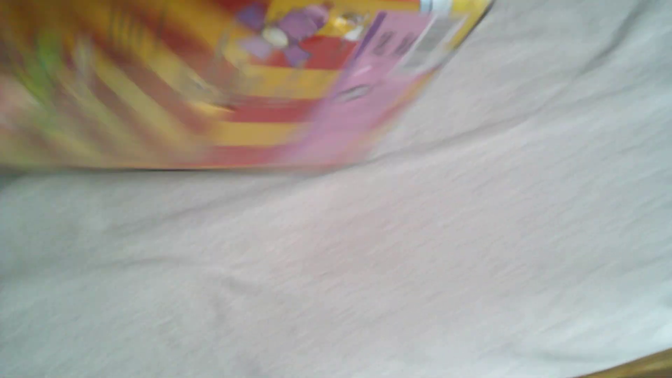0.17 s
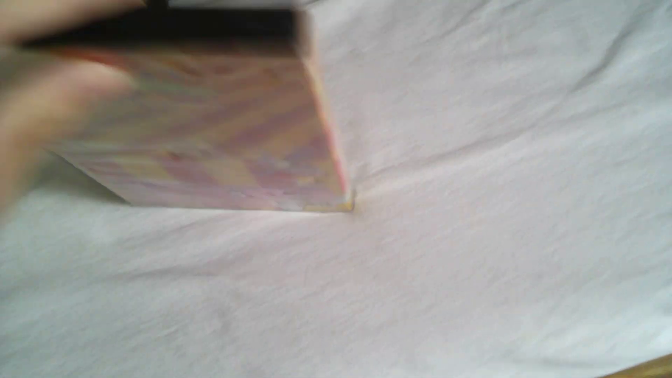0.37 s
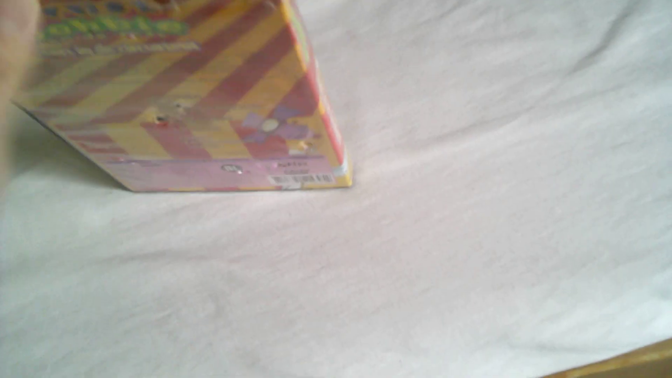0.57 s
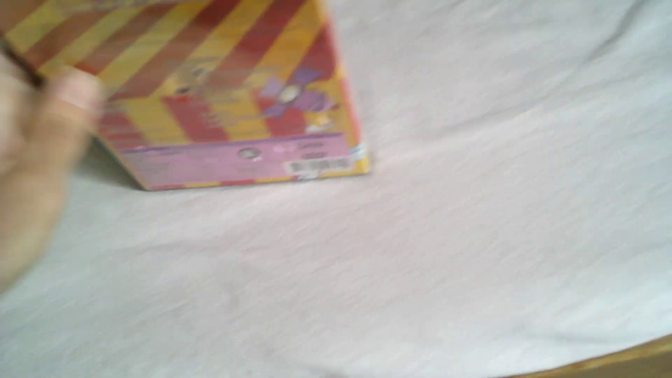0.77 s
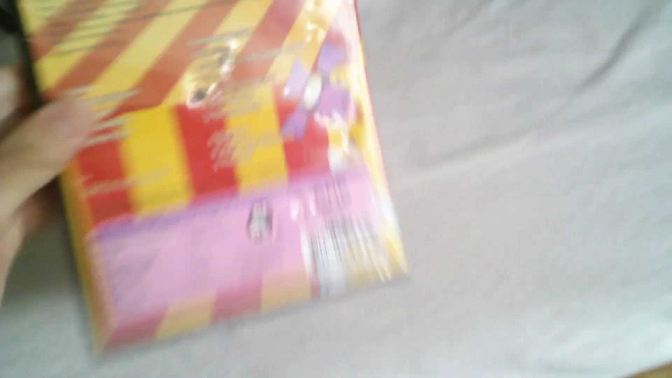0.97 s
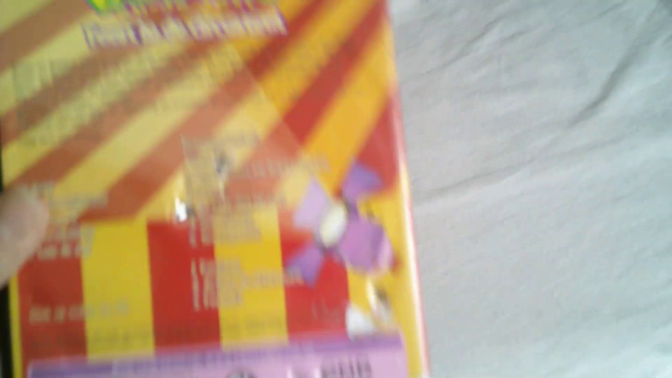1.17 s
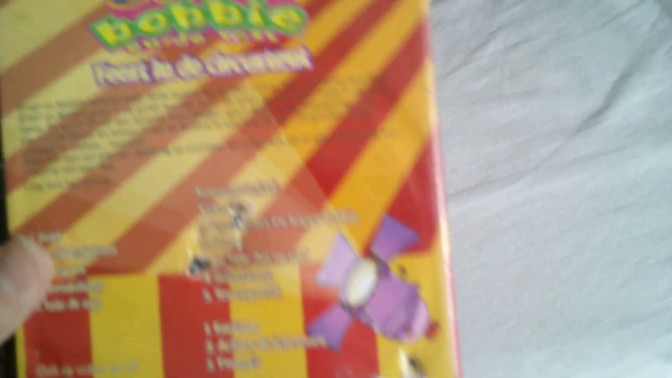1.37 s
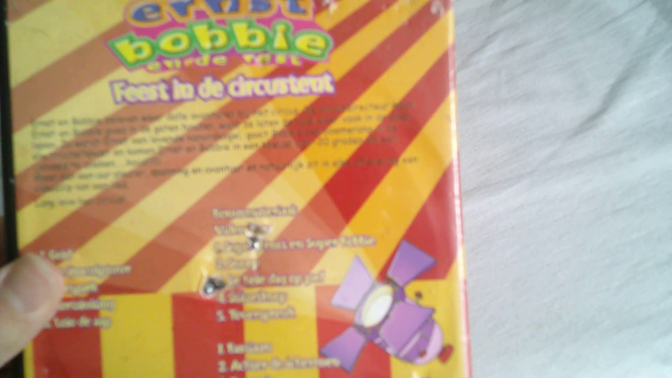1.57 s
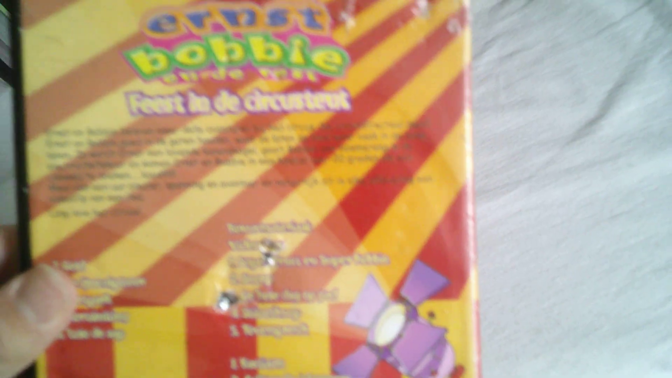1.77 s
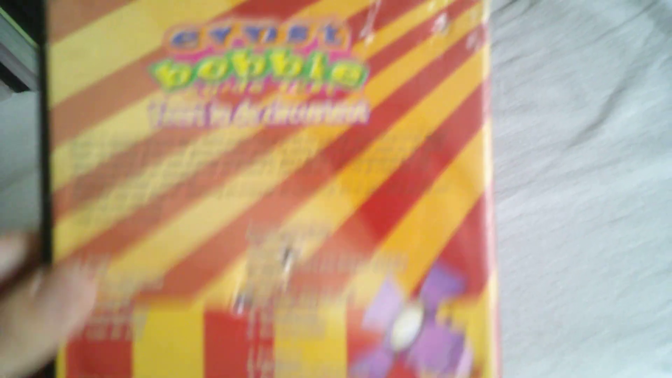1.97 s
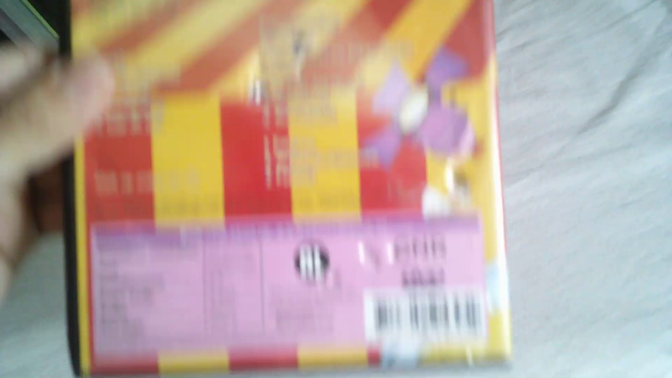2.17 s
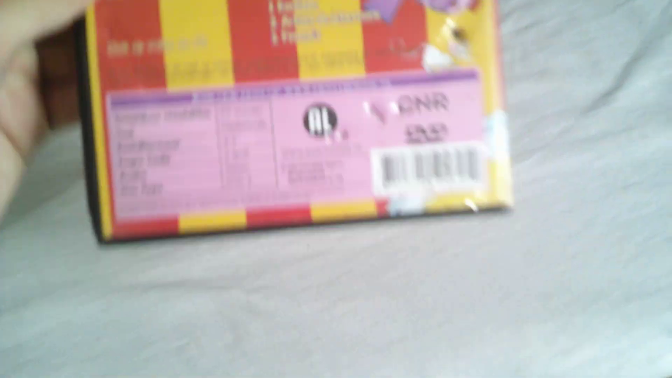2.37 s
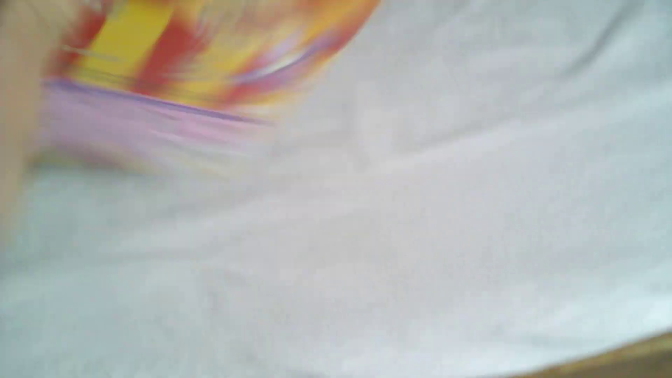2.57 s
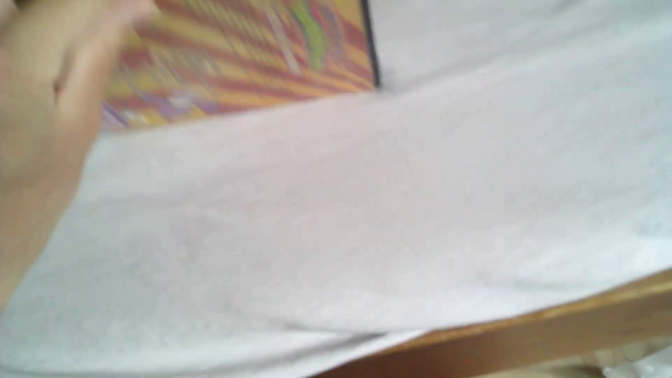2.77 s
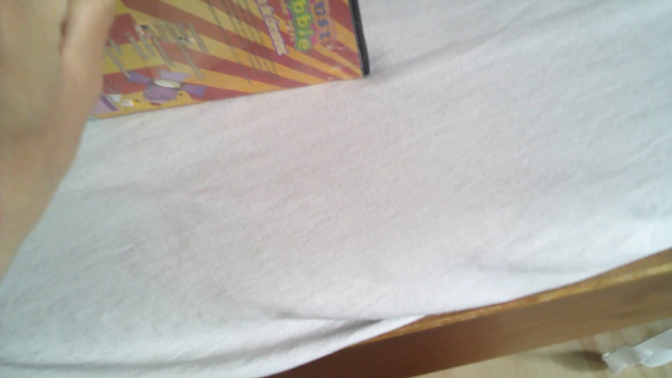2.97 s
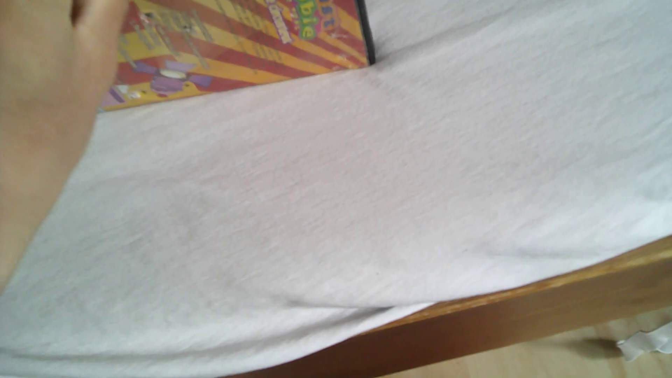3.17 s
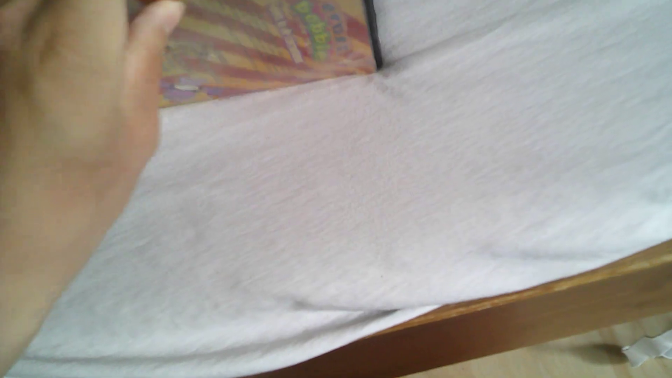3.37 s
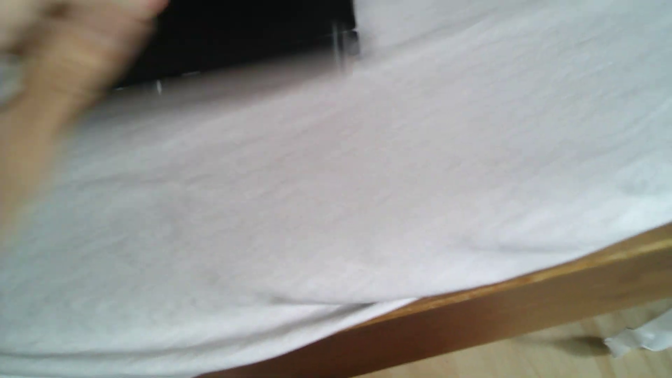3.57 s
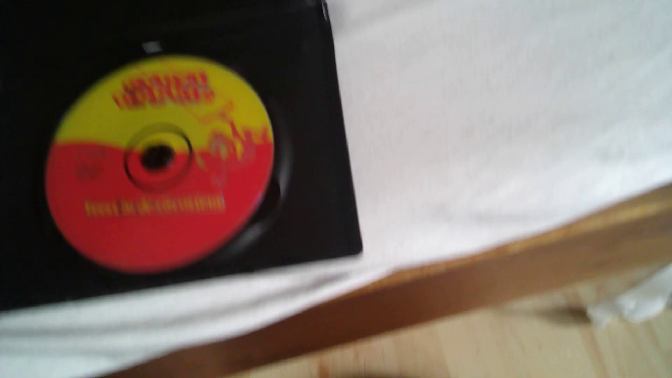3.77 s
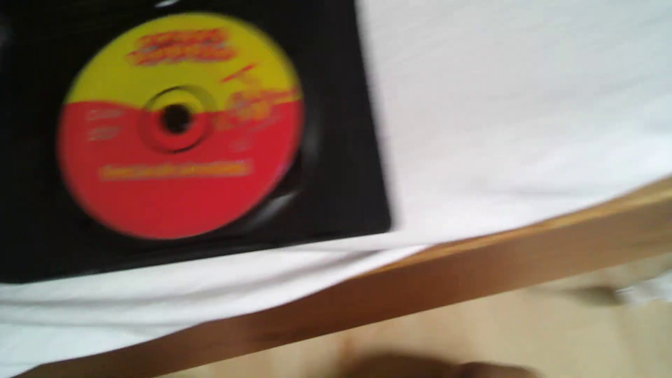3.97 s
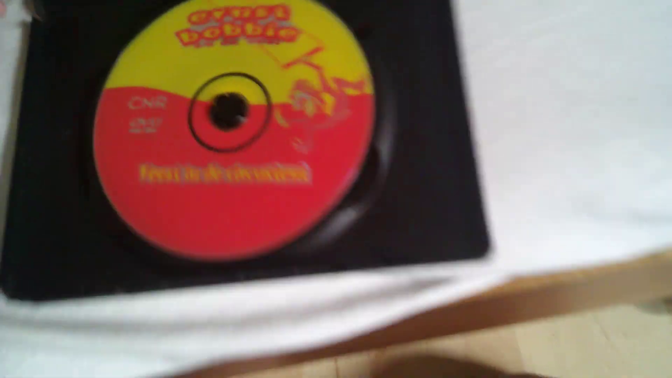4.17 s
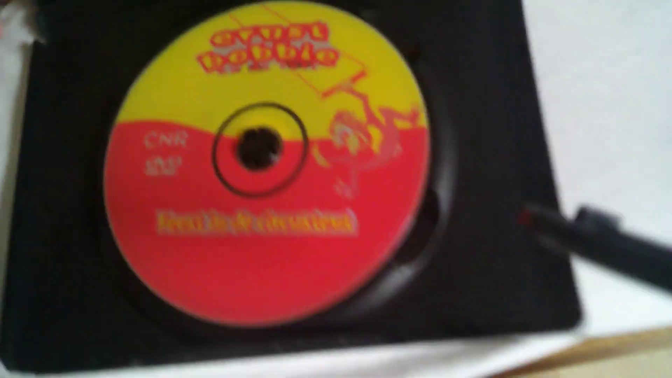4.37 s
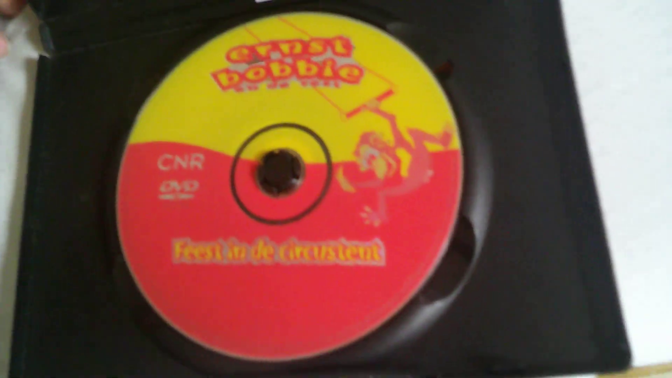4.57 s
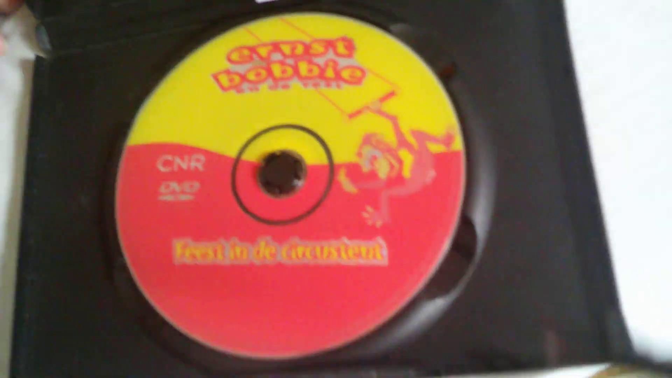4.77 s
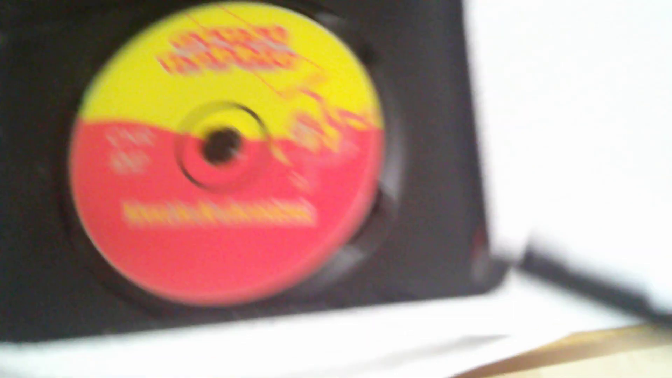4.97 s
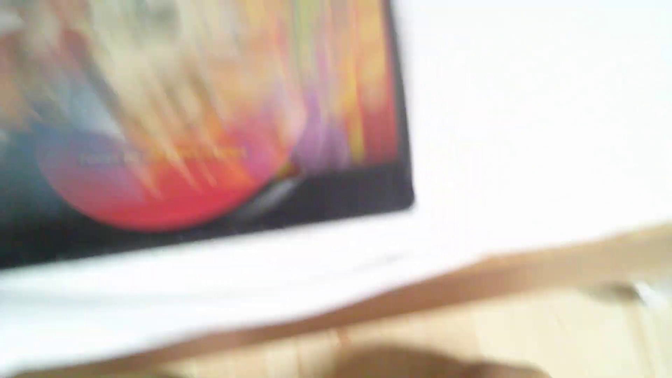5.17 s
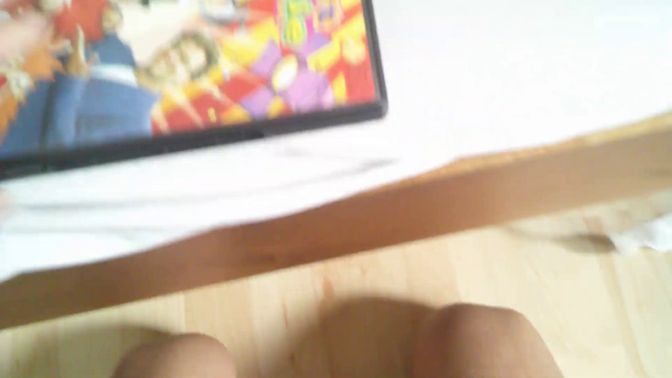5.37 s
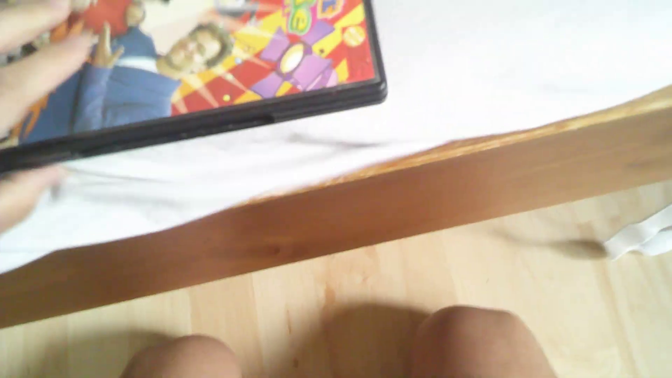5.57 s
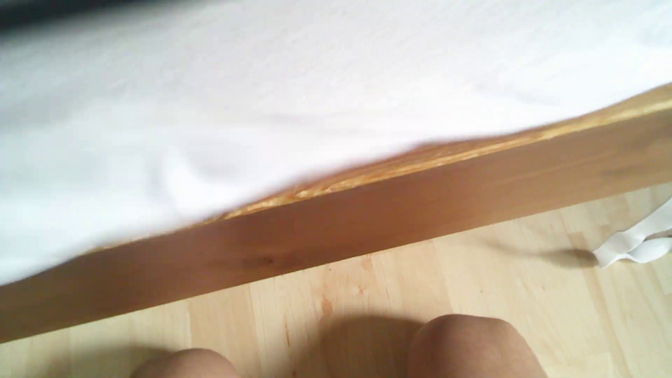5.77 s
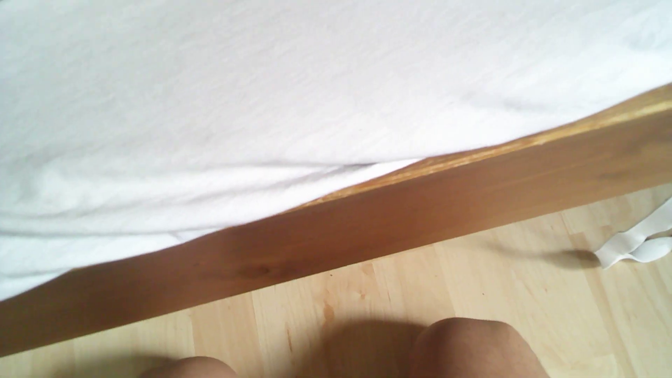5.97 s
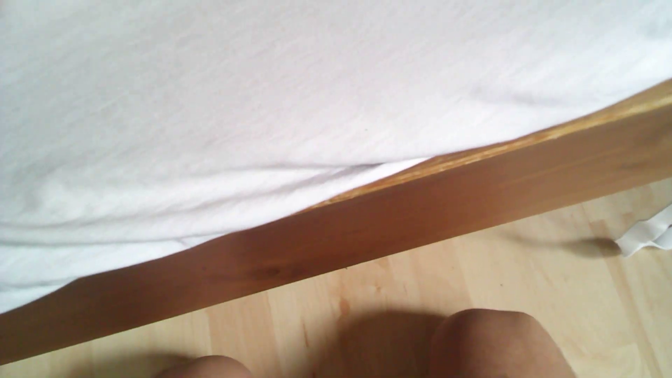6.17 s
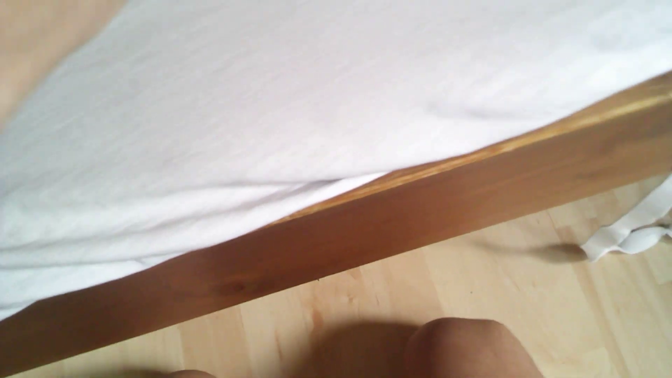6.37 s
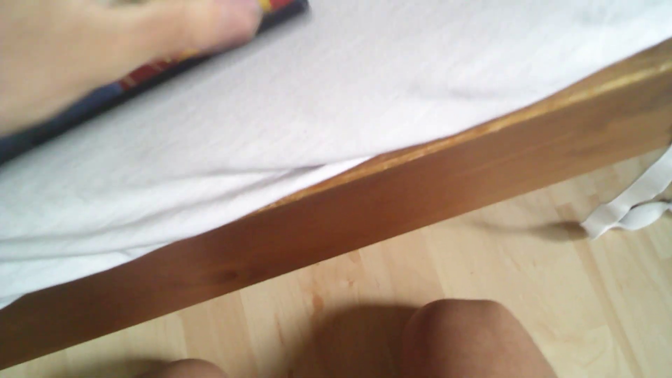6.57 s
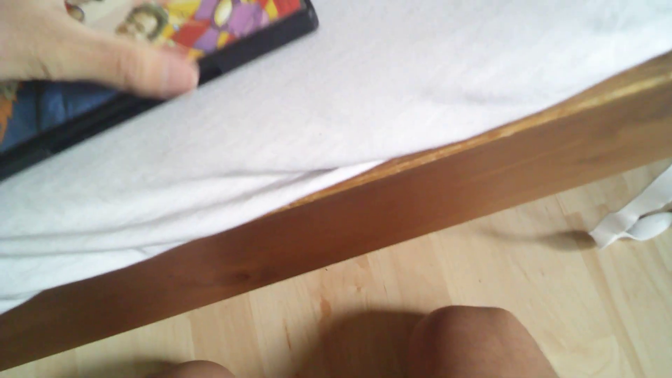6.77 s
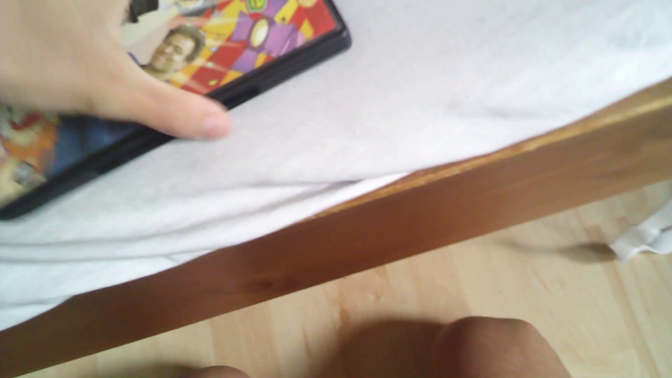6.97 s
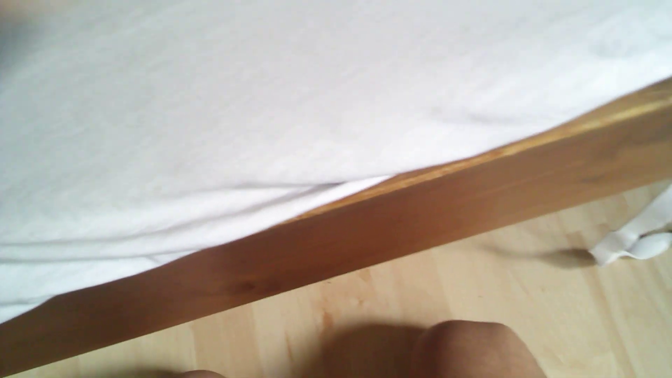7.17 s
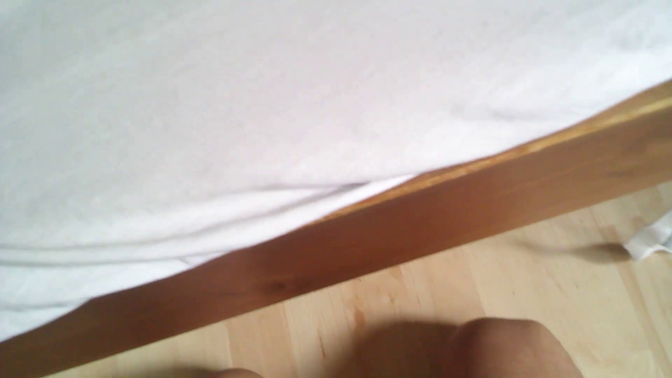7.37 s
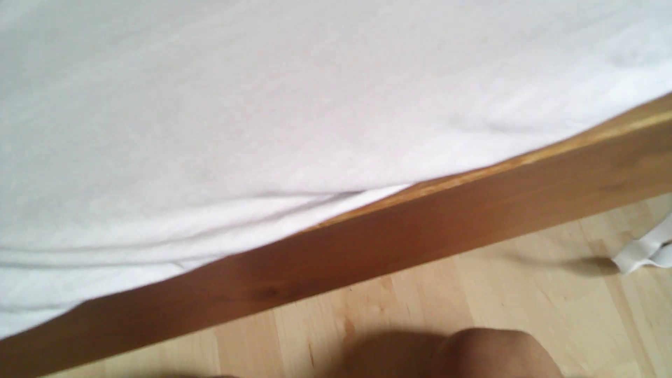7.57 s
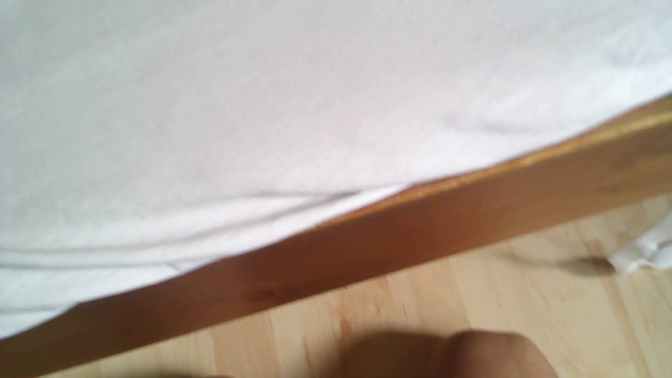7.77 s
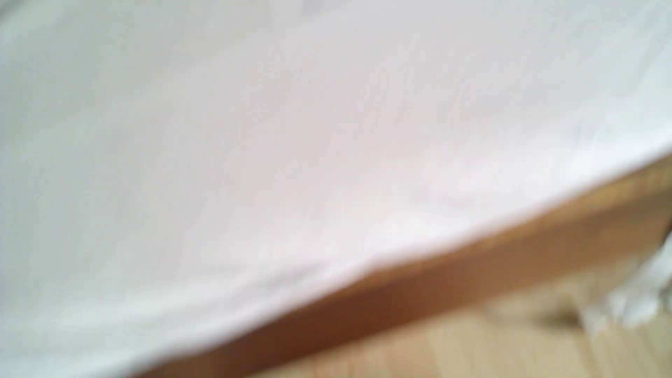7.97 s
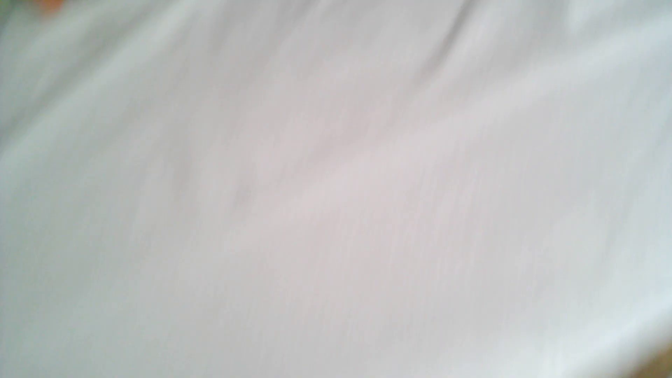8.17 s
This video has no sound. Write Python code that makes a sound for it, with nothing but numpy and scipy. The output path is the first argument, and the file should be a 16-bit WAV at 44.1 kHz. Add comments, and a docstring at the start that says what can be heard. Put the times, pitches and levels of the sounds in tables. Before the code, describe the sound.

A small, quiet room with low dull air noise and a faint hum, captured close with slightly dulled treble. From 0 to 1.1 s, fingers slide softly over a thin plastic case, with faint ticks, a slight creak and light clicks around 0.5, 0.7 and 1.1 s. It is nearly still until about 2.3 s; small clicks gather from 2.6 to 3.1 s. At 3.4 s a dense, loud burst of hard, hollow clacks with a bright rattle and low knock marks the opening. Faint handling fades into another pause from about 4 to 5 s. Small clacks, creaks and short scrapes run from 5.1 to 5.7 s, then the loudest, sharpest snap cracks at 6 s. Clacks with soft bedding knocks follow at 6.4 and 6.6-6.9 s, a faint tick at 7.1 s, and a final double clack and rattle near 7.6 s before quiet.

```python
"""A hand turns, opens and shuts a thin plastic case over a bed in a small quiet room with dull air and faint hum.
First come light clicks and sliding fingers, then a near-still pause and, past 3 s, a dense burst of hard clacks.
After another pause clacks and short scrapes lead to a sharp snap near 6 s; clacks with soft knocks follow.
Bursts of slips ring the shell, panels, ribs and a bright band; grains of noise make the slide, creak and rattle,
damped low tones the knocks on bedding and hand, and a short tail of random taps the room."""
import sys
import numpy as np
from scipy import signal
from scipy.fft import rfft, irfft, next_fast_len
from scipy.io import wavfile
from scipy.ndimage import uniform_filter1d

SR = 44100
rng = np.random.default_rng(int(sys.argv[2]) if len(sys.argv) > 2 else 0)


def digitize_waveform(pressure):
    """Quantize a signal to 16-bit integers and store it at the path in sys.argv[1].

    Rows of a 2-D input are taken as channels; values are limited to [-1, 1].
    """
    field = np.atleast_2d(pressure).T
    bounded = np.clip(field, -1, 1)
    quanta = np.round(bounded * 32767).astype(np.int16)
    wavfile.write(sys.argv[1], SR, quanta)


def rack_gain(trim_db):
    """Turn a fader trim in dB into the linear factor to multiply a signal by."""
    fader = np.asarray(trim_db, float)
    return 10 ** (fader / 20)


N = 362061  # length in samples


def evened(x):
    """Scales to rms 1."""
    return x / np.sqrt(np.mean(x ** 2) + 1e-20)


def read(points, hz):
    """Reads a table of (Hz, value) on a log frequency axis."""
    f, value = np.transpose(points)
    return np.interp(np.log(hz + 1), np.log(f + 1), value)


def add(mix, s, sound):
    """Mixes a sound in at s seconds, cut at the end of the mix."""
    part = mix[round(s * SR):][:len(sound)]
    part += sound[:len(part)]


def coloured(x, points):
    """Filters x by a spectrum table, then scales it to rms 1."""
    size = next_fast_len(N)
    gain = rack_gain(read(points, np.fft.rfftfreq(size, 1 / SR)))
    return evened(irfft(rfft(x, size) * gain, size)[:N])


def room_tone():
    """Dull air noise with a slow swell, and two fuzzy tones whose phase and level drift at random."""
    # Colour of the air. Each row: frequency in Hz, relative level in dB per Hz.
    air = [(9, -41), (15, -8.5), (60, -3.5), (117, -3), (170, -4.5), (320, -11.5), (600, -19.5),
           (1200, -24.5), (2500, -31), (4000, -38), (5100, -43), (6300, -38.5), (7200, -37), (8300, -48.5)]
    # Wavering tones. Each row: frequency in Hz, width in Hz, level in dB.
    hum = [(173, 37, -72.5), (365, 14, -77.5)]
    air_db, swell_db = -61, 0.5
    t = np.arange(N) / SR
    swell = np.zeros(N)
    for f in np.geomspace(0.2, 5, 20):
        swell += np.sin(2 * np.pi * (f * t + rng.random())) / np.sqrt(f)
    out = rack_gain(air_db + swell_db * evened(swell)) * coloured(rng.standard_normal(N), air)
    for hz, width_hz, db in hum:
        r = np.exp(-np.pi * width_hz / SR)
        noise = rng.standard_normal(N) + 1j * rng.standard_normal(N)
        drift = signal.lfilter([1], [1, -r], noise)
        tone = (drift * np.exp(2j * np.pi * hz * t)).real
        out += rack_gain(db) * evened(tone)
    return out


def room(x):
    """Taps of random sign that build up over the first walls, each band dying at its own speed."""
    # Decay of the room. Each row: frequency in Hz, time to fall by 60 dB in seconds.
    decay = [(200, 0.2), (800, 0.24), (2100, 0.24), (5500, 0.32), (8500, 0.18)]
    room_db, build_up_s = -10, 0.005
    taps = np.zeros(SR // 2)
    spots = np.arange(130, SR // 2 - 12, 12)  # in samples: one tap in every 12, none before 3 ms
    taps[spots + rng.integers(0, 12, len(spots))] = rng.choice([-1.0, 1.0], len(spots))
    taps *= 1 - np.exp(-np.arange(len(taps)) / SR / build_up_s)
    hz, t, z = signal.stft(taps, SR, nperseg=256)
    fading = z * rack_gain(-60 * t / read(decay, hz)[:, None])
    tail = signal.istft(fading, SR, nperseg=256)[1]
    return signal.fftconvolve(x, tail * rack_gain(room_db) / np.linalg.norm(tail))[:N]


def hands():
    """Skin slides in fine dense grains; the flexed shell creaks in coarser slips that come in clumps."""
    # Finger strokes, and the rattle and scrape after loud blows. Each row: peak in seconds,
    # slide hiss in dB, shell creak in dB, rise in seconds, fall in seconds.
    strokes = [(.002, -68.5, -72, 0.054, 0.091), (.247, -70.5, -72, .13, 0.27),
               (.39, -70.5, -68.5, 0.11, 0.18), (.529, -67, -63, .09, 0.18), (.75, -62, -66.5, 0.15, .09),
               (.912, -63.5, -69.5, .08, 0.21), (1.036, -80, -54, 0.039, 0.032),
               (2.72, -67.5, -76, 0.049, .12), (2.867, -61.5, -56.5, 0.16, .14),
               (3.087, -76, -68.5, 0.12, 0.042), (3.375, -36.5, -35, 0.0063, .04),
               (3.506, -59, -56.5, 0.11, 0.067), (3.674, -70, -66, .15, .08), (3.873, -81, -73, 0.14, .17),
               (4.047, -78, -78, 0.096, 0.1), (5.023, -70.5, -72, 0.26, .25),
               (5.214, -66, -79.5, 0.11, 0.22), (5.368, -59.5, -46, 0.036, 0.049),
               (5.551, -68, -56.5, 0.06, 0.068), (5.753, -72.5, -80, .13, 0.23),
               (6.194, -70, -73, 0.27, 0.076), (6.39, -53.5, -47, .025, 0.15),
               (6.44, -49.5, -54, 0.048, .12), (6.617, -59, -50.5, 0.045, 0.075),
               (6.711, -62, -56.5, .08, .13), (6.868, -53, -46, 0.044, 0.057), (7.121, -78, -75, .12, .13),
               (7.389, -81, -92, .2, .15), (7.56, -67, -85, 0.11, .05), (7.6, -52.5, -44.5, 0.015, 0.17),
               (7.645, -48, -45.5, 0.04, 0.13), (7.8, -72.5, -71.5, .15, 0.25)]
    # Colour of the sliding skin. Each row: frequency in Hz, relative level in dB per Hz.
    slide_colour = [(1760, -48), (3000, -24.5), (3750, -9.5), (4320, -11), (5500, -11.5), (7290, 5.5),
                    (7740, -2.5), (8910, -18.5), (11600, -65.5), (19600, -120)]
    # Colour of the flexed shell, ringing most near 850 Hz. Each row: frequency in Hz, relative level in dB per
    # Hz.
    creak_colour = [(300, -28.5), (580, -8), (830, 0.5), (1050, -4), (1400, -5.5), (1800, -7.5),
                    (2400, -9.5), (2900, -7.5), (3400, -12.5), (5000, -34.5)]
    stroke_fade_db = 20  # a stroke is this far under its peak one rise before and one fall after
    grip_slide_db, grip_creak_db = -92.5, -86  # the resting grip between strokes
    slips_per_s = 6000  # on average
    grain_swell = rack_gain(2.7 * evened(uniform_filter1d(rng.standard_normal(N), 150)))
    fine = rng.standard_normal(N) * grain_swell
    clumps = rack_gain(3.0 * evened(uniform_filter1d(rng.standard_normal(N), 260)))
    coarse = rng.standard_normal(N) * clumps * (rng.random(N) < slips_per_s / SR)

    t = np.arange(0, N / SR + 0.002, 0.002)  # levels are drawn every 2 ms
    s, slide_db, creak_db, rise_s, fall_s = np.transpose(strokes)[:, :, None]
    fade_db = stroke_fade_db * np.maximum((s - t) / rise_s, (t - s) / fall_s)
    # the strongest stroke of the moment sets the level
    slide_level = np.maximum((slide_db - fade_db).max(0), grip_slide_db)
    creak_level = np.maximum((creak_db - fade_db).max(0), grip_creak_db)
    now = np.arange(N) / SR
    slide = rack_gain(np.interp(now, t, slide_level)) * coloured(fine, slide_colour)
    creak = rack_gain(np.interp(now, t, creak_level)) * coloured(coarse, creak_colour)
    return slide + creak


def thumps():
    """Soft knocks on bedding and hand: a low push with a soft start, damped at once by cloth."""
    # Each row: start in seconds, level in dB, pitch in Hz, time to fall by 60 dB in seconds.
    knocks = [(0.51, -38, 134, 0.026), (2.811, -45.5, 302, 0.039), (3.364, -29, 222, 0.048),
              (3.363, -36, 501, 0.046), (5.344, -36, 337, 0.039), (5.979, -39, 211, 0.066),
              (6.374, -37.5, 264, 0.041), (6.409, -40, 293, 0.056), (6.6, -48, 203, 0.071),
              (6.692, -26.5, 169, 0.031), (6.794, -42.5, 306, 0.046), (6.856, -30, 322, 0.023),
              (6.858, -44, 144, 0.074), (7.108, -46, 133, .054), (7.578, -39.5, 252, 0.051),
              (7.62, -25.5, 346, 0.038), (7.625, -35.5, 146, 0.043), (7.679, -32, 267, 0.023)]
    out, t = np.zeros(N), np.arange(6000) / SR
    soft_start = (1 - np.exp(-t / 0.001)) ** 2
    for s, db, hz, t60 in knocks:
        add(out, s, rack_gain(db - 60 * t / t60) * soft_start * np.cos(2 * np.pi * hz * t))
    return out


def body(modes, chance, scale_hz, ring_share):
    """The ring of a set of modes after one slip, each mode's pitch and level scattered by chance."""
    detune, scatter_db = 0.017, 3.5  # spread of pitch as a share, spread of mode levels
    rise_cycles = 0.93  # a mode takes part of a cycle to build up
    t = np.arange(1024) / SR
    f, db, t60 = np.transpose(modes)[:, :, None]
    f = f * scale_hz * (1 + detune * chance[:len(modes), :1])
    db = db + scatter_db * chance[:len(modes), 1:]
    rise = 1 - np.exp(-f * t / rise_cycles)
    fall = rack_gain(db - 60 * t / (t60 * ring_share))
    return (rise * fall * np.sin(2 * np.pi * f * t)).sum(0)


def clicks():
    """Each contact is one sharp slip and a fading chatter of others; the room gets the same energy, blurred."""
    # Clicks, snaps, clacks and short scrapes. Each row: start in seconds, shell pitch under the grip in Hz,
    # strength in dB, hardness in dB, contact time in ms.
    contacts = [(0.1306, 750, -65, -16, 18), (.1744, 820, -65, -7.5, 14), (.419, 650, -61, -16, 11),
                (.5082, 660, -52.5, -3, 10), (0.522, 1250, -58.5, -7, 5.3), (.5906, 633, -68, 1, 4.6),
                (0.7342, 1184, -45, -27, .78), (1.0154, 734, -52, -9, 7), (1.035, 770, -55.5, -9.5, 7.8),
                (1.0593, 790, -60, -8, 6.4), (1.1231, 896, -48.5, -6.5, 3.2), (2.292, 1030, -65, -14, 3.1),
                (2.6264, 775, -57, -11.5, 9), (2.65, 830, -62, -20, 8.5), (2.7408, 780, -48.5, -6, 8.3),
                (2.759, 680, -52.5, -19, 5), (2.809, 700, -50.5, -2, 12), (2.8254, 805, -51, -17, 11),
                (2.8452, 820, -59, -1, 4.7), (2.8648, 755, -47, -2.5, 3.5), (2.8785, 840, -49.5, 0.5, 4.8),
                (2.899, 810, -61, 11, 8.6), (3.0555, 824, -60, -30, 17), (3.0694, 940, -42.5, -17, 5.5),
                (3.1356, 880, -70.5, -2, 9.4), (3.2056, 1130, -55.5, -11.5, 5.5),
                (3.278, 870, -71.5, 15, 7.3), (3.3194, 670, -68, -11.5, 4.7),
                (3.3625, 1150, -31.5, -1.7, 9.1), (3.3714, 784, -40, -7, 3.4), (3.3816, 1205, -34, -5, 5.6),
                (3.389, 1230, -32, 6.5, 4.2), (3.4016, 693, -42, 13, 6.1), (3.421, 1090, -57.5, 16.5, 11),
                (3.4544, 690, -50.5, 5, 11), (3.489, 726, -55, 3, 6.9), (3.653, 1176, -59.5, 6.5, 15),
                (3.861, 634, -62, -11, 6.6), (4.03, 1400, -65.5, -18, 9.3), (5.075, 940, -62.5, -9, 3.7),
                (5.101, 620, -67.5, 6, 2.1), (5.168, 620, -67, -2, 10), (5.1955, 594, -54.5, 1.5, 1.9),
                (5.2104, 726, -64, -8.5, 9), (5.273, 760, -54, -4, 11), (5.2865, 920, -65, 4.5, 4.9),
                (5.315, 657, -56, -4, 4.1), (5.3431, 670, -40.5, -8, 3.5), (5.3504, 935, -38, -6.5, 7.1),
                (5.3898, 900, -48.5, -5, 9.6), (5.4068, 1020, -48.5, -15, 9.9), (5.467, 960, -51, -10.5, 7),
                (5.483, 850, -49, -3, 8.1), (5.526, 945, -45.5, -11.5, 9.9), (5.56, 846, -50, -5.5, 10),
                (5.5793, 930, -57, -11.5, 6.6), (5.7202, 780, -63, -19, 7.1), (5.9252, 765, -58, -12, 19),
                (5.9775, 907, -23.5, 6.5, 2), (6.3755, 737, -41.5, 0, 5.9), (6.3838, 800, -45.5, -15, 5.2),
                (6.4098, 784, -26, -2.5, 1.64), (6.415, 810, -40.5, 4.5, 8), (6.6006, 844, -46.5, 0, 7.1),
                (6.6929, 686, -42.5, -1, 7), (6.7554, 875, -51.5, -17, 5.1), (6.7687, 726, -49, -13.5, 4.8),
                (6.7942, 664, -46.5, -7, 12), (6.8412, 714, -52.5, -9.5, 4.7), (6.8523, 1005, -48, -1, 7.6),
                (6.8607, 766, -39, -20, 9.2), (7.1082, 744, -62, -15, 6.3), (7.5774, 780, -33, -6, 4.7),
                (7.6214, 907, -29.5, -2.5, 3.9), (7.6344, 726, -37, 10, 12), (7.6556, 700, -40.5, -6.5, 13),
                (7.6803, 615, -48, 6, 5.6)]
    # Modes of the hollow shell. Each row: multiple of the shell pitch, relative level in dB,
    # time to fall by 60 dB in seconds.
    shell = [(1.033, 9, 0.014), (0.91, -7.5, 0.011), (0.68, -8.5, 0.008), (1.38, -12.5, 0.0055)]
    # Modes of panels, ribs and bright band. Each row: frequency in Hz, relative level in dB,
    # time to fall by 60 dB in seconds.
    panels, ribs, bright = [(1732, 6.5, 0.0064), (2050, 0.5, 0.0089), (2360, 1, 0.0084)], [(3110, 1.5, 0.0066), (3380, -2, 0.0057), (3730, -7.5, 0.0073),
                                            (4346, -3.5, 0.0058), (4860, -11, .006)], [(6420, 4, 0.0089), (6974, 13, 0.0078),
                                                          (7314, 10, 0.009), (8050, -5, .004),
                                                          (8450, -8, 0.0051)]
    # A soft blow (hardness under 0) favours the shell, a hard one the bright ring. One row each for shell,
    # panels, ribs, bright: dB under the strength, dB lost per dB of softness, dB lost per dB of hardness.
    sharing = [(-0.5, 0, 1), (1, 0.45, 0.38), (2, 1.13, 0.44), (0.5, 1, 0)]
    # Summed over all directions the modes blur: ring time towards the room as a share, for each set.
    damped_shares = (0.42, 0.31, 0.25, .4)
    # How freely the flat panels ring in the grip; what they gain the ribs lose.
    # Each row: time in seconds, panel gain in dB.
    free_panels = [(.1, 3), (.75, 0), (1.0, -5), (1.13, -5.5), (2.6, 1), (3.3, -1), (3.39, 0.5), (3.7, 5),
                   (5.1, 0.5), (5.27, 4), (5.6, 4.5), (5.97, -0.7), (6.42, 0.2), (6.8, 2.5), (6.86, 0),
                   (7.58, -6), (7.62, -1.5), (7.7, 0.5)]
    level_span = SR // 100  # click levels are rms over this many samples
    bass_cut_hz = 140  # the clicks hold little bass below this

    near, around = np.zeros(N), np.zeros(N)
    t_ms = np.arange(1536) / SR * 1000
    chance = rng.standard_normal((len(contacts), 4, 6, 2))
    chatter = rng.standard_normal((len(contacts), 1536))
    chatter *= rng.random(chatter.shape) < 0.16  # share of samples that hold a slip
    for (s, shell_hz, strength_db, hard_db, contact_ms), lucks, sizes in zip(contacts, chance, chatter):
        slips = sizes * np.exp(-(t_ms / np.clip(contact_ms, 0.3, 15)) ** 2)
        slips[0] = 1.7 * np.sqrt(contact_ms)  # the first touch leads
        under, per_soft, per_hard = np.transpose(sharing)
        levels_db = strength_db - under - per_soft * max(-hard_db, 0) - per_hard * max(hard_db, 0)
        levels_db = levels_db + np.interp(s, *np.transpose(free_panels)) * np.array([0, 1, -1, 0])
        parts = zip((shell, panels, ribs, bright), levels_db, (shell_hz, 1, 1, 1), damped_shares, lucks)
        for modes, db, scale_hz, damped, luck in parts:
            sound = signal.fftconvolve(slips, body(modes, luck, scale_hz, 1))
            blurred = body(modes, 0 * luck, scale_hz, damped)
            energy = rack_gain(db) * np.sqrt(level_span)
            add(near, s, sound * energy / np.linalg.norm(sound))
            add(around, s, blurred * energy / np.linalg.norm(blurred))
    bass_cut = signal.butter(N=2, Wn=bass_cut_hz, btype="high", fs=SR, output="sos")
    return signal.sosfilt(bass_cut, [near, around])


def scene():
    """Case and hands with their room, over the room tone."""
    near, around = clicks()
    soft = thumps() + hands()
    return (near + soft + room(around + soft) + room_tone())[None]


def low_pass(x):
    """Removes everything above the highest recorded frequency."""
    return signal.sosfilt(signal.butter(12, 9060, fs=SR, output="sos"), x)


def record(dry):
    """A narrow-band recorder: the treble rolls off ever more steeply from about 7.9 kHz."""
    edge_hz, edge_width_hz = 8460, 550  # the roll-off begins one width under the edge
    size = next_fast_len(N)
    hz = np.fft.rfftfreq(size, 1 / SR)
    over = np.maximum(hz - edge_hz + edge_width_hz, 0) / edge_width_hz
    loss_db = np.minimum(2.5 * over ** 2 + 0.55 * over ** 4, 100)
    narrow = irfft(rfft(dry, size) * rack_gain(-loss_db), size)[:, :N]
    return low_pass(narrow)


dry = scene()
out = record(dry)
digitize_waveform(out)
```